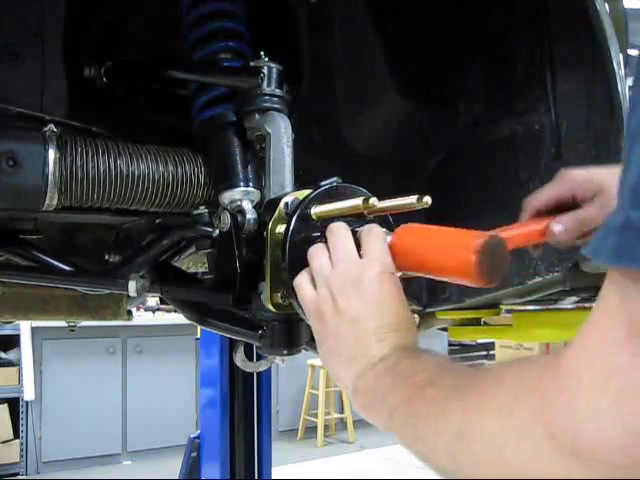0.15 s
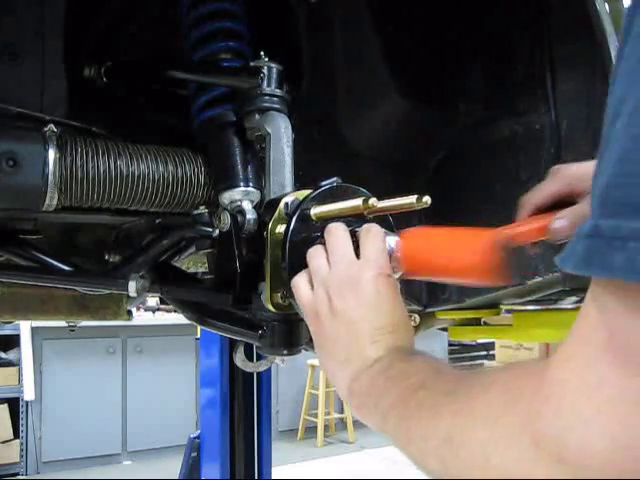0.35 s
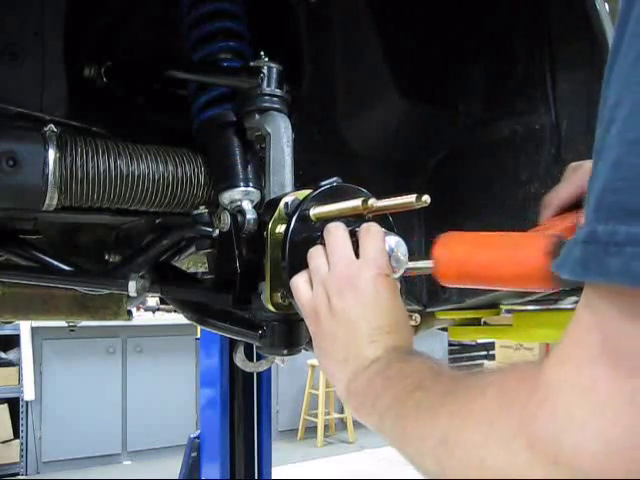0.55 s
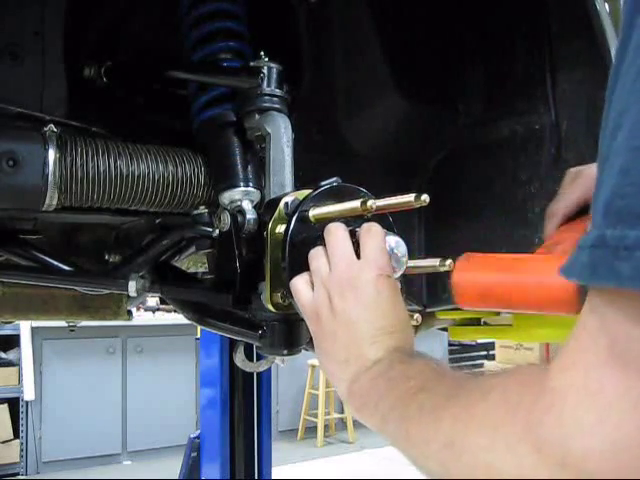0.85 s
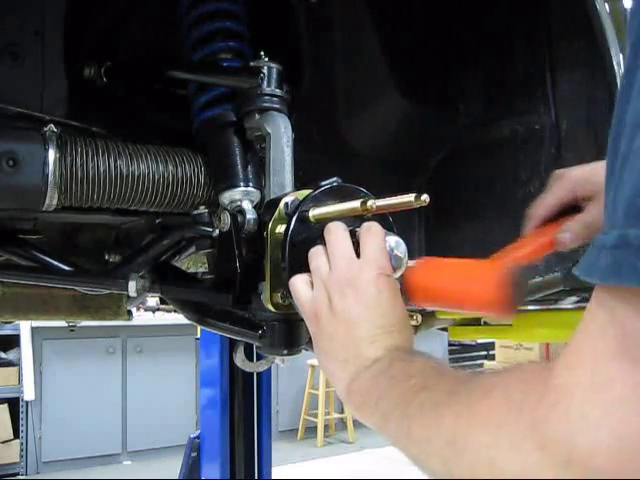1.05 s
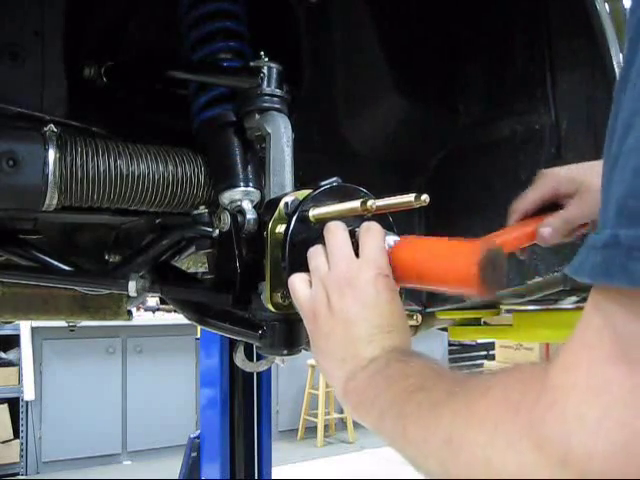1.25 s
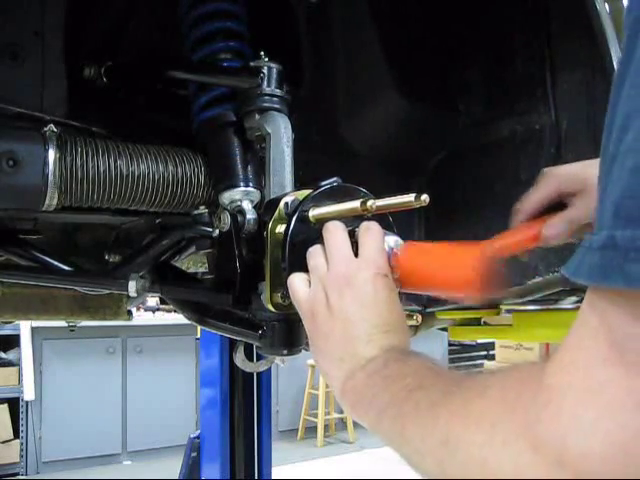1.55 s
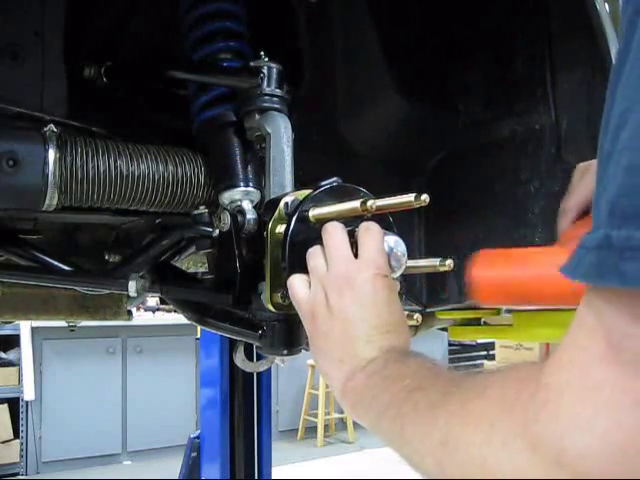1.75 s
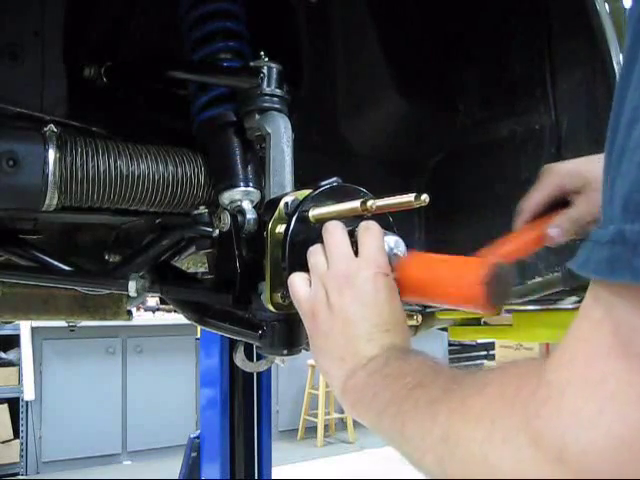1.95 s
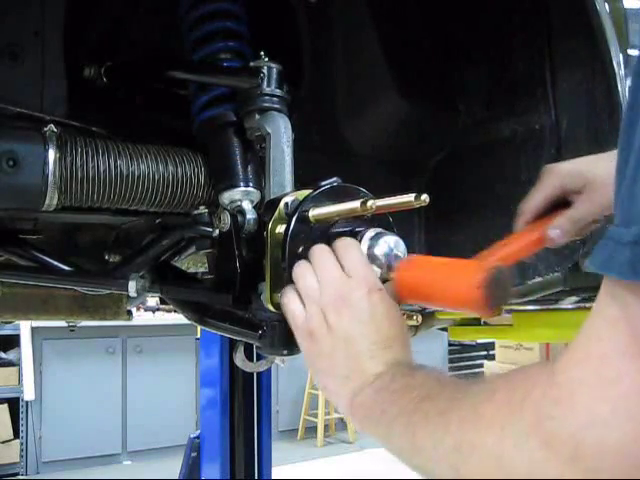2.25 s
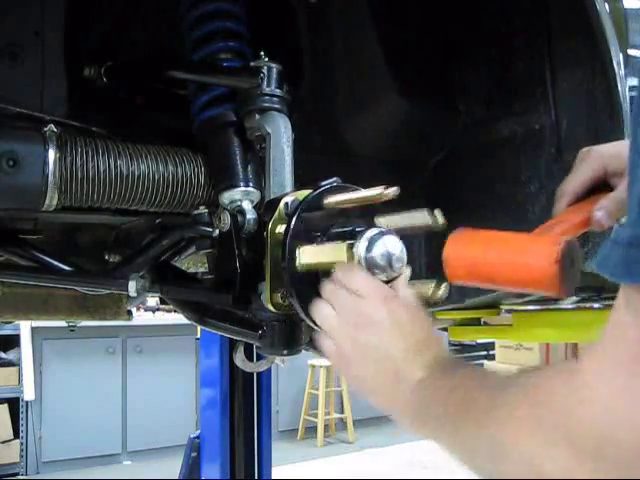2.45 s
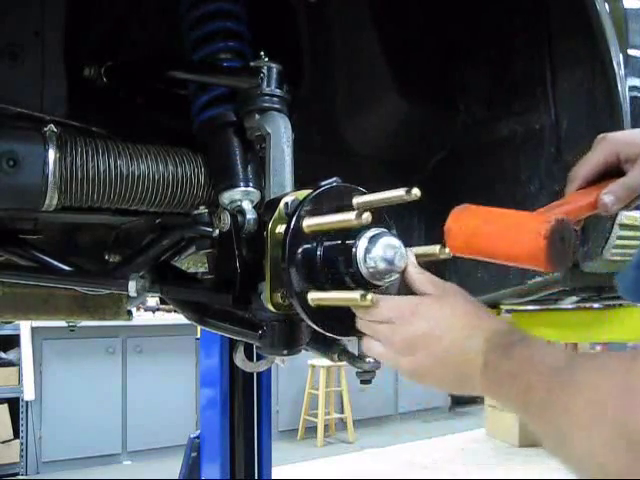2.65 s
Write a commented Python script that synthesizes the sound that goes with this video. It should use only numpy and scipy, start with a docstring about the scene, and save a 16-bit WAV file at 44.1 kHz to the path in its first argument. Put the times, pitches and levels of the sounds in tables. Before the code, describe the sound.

A mallet taps a metal cap eight times, growing louder, in an echoing workshop.

```python
"""A car workshop, the camera microphone close to a wheel hub: a rubber mallet taps a metal cap eight times.
Each swing swishes, the cap clacks (its ring differs from blow to blow), the suspension booms,
and the wheel well and the room answer. Hands rustle faintly over the steady air of the workshop.
At this distance the camera clips the blows, ducks its gain and lets the echo swell back."""
import sys
import numpy as np
from scipy import signal
from scipy.fft import rfft, irfft, next_fast_len
from scipy.io import wavfile
from scipy.ndimage import uniform_filter1d, map_coordinates

SR = 44100
rng = np.random.default_rng(int(sys.argv[2]) if len(sys.argv) > 2 else 0)


def log_audio(samples):
    """Write samples as a 16-bit WAV file to the path given in sys.argv[1]."""
    # one column per channel
    frames = np.atleast_2d(samples).T
    # limit to full scale, then quantise
    limited = np.clip(frames, -1, 1)
    pcm = np.round(limited * 32767).astype(np.int16)
    wavfile.write(sys.argv[1], SR, pcm)


N = 123479
EVENT_N = 57344  # samples for one event to ring out
EVENT_T, SCENE_T = np.arange(EVENT_N) / SR, np.arange(N) / SR

# Mallet blows: start_s, level_db, clack_db, bass_db, middle_db, presence_db, treble_db, top_db,
# ring_blend (0 is the cap's ring A, 1 its ring B), ring_length_factor
BLOWS = [(.2059, -14, 6, -4, 2, 1.5, -2.5, -0.5, 0.07, 0.88),
         (0.486, -11.5, 6, 6, 2.5, 4, -3, -4, 0.93, 0.7),
         (0.7605, -5, 2.5, 5, 4.5, 2, -2.5, -4.5, 0.6, 1.17),
         (1.0525, -2, 0.5, 6, 0.5, 2, -0.5, -1, 0.58, 1),
         (1.3499, -1.5, -2.5, 2.5, 4, 4.5, 0.5, 2, 0.27, 1.54),
         (1.6682, 4.5, -14.5, -2, -3, 1, 7, 2, 0.93, 1.9), (1.9884, 1.5, -5, 2, .5, -2.5, -2, -8, 0.99, 3),
         (2.2731, 2, -4, 0, 0, -2, -3.5, -8, 0.36, 2.6)]
# Modes of the cap, with two sets of levels: pitch_hz, ring_a_db, ring_b_db, base_t60_s
CAP_MODES = [(572, 1, -8, 0.014), (603, -13, -45, 0.34), (830, -6.5, -1.5, 0.0084), (1050, -9, -1.5, 0.011),
             (1430, -6.5, -7.5, 0.033), (1826, -19, -0.5, 0.0055), (2140, -11, -7.5, 0.01),
             (2705, -7.5, 4.5, 0.011), (3013, 2.5, -15, 0.0097), (4280, 0, -0.5, 0.0084),
             (4630, -4, 1.5, .011), (5464, -0.5, 1.5, 0.0095), (6860, -22, -10.5, 0.01),
             (9950, -14, -1, 0.0068)]
# Contact noise of mallet on cap: frequency_hz, gain_db
CRACK_SPECTRUM = [(60, 2), (300, -17), (1000, 8), (3000, -3), (6000, 0.5), (9000, -15.5), (15000, 5.5)]
# Modes of hub and suspension: pitch_hz, level_db, t60_s
HUB_MODES = [(142.9, -21, 0.43), (179, -18, 0.41), (199, -11, 0.28), (252.4, -19.5, 0.58),
             (295.3, -23.5, .7), (339.9, -18.5, 0.78), (359, -17, 0.7), (386, -9, 0.13), (455, -20, 0.55),
             (595, -24.5, 0.62), (764, -15.5, 0.23), (848, -27, 0.81), (996, -32, 1), (1154, -35, 1.0),
             (1420, -24.5, 0.64), (3960, -32, 0.55), (4100, -29, 0.38)]
# Close reflections in the wheel well: frequency_hz, gain_db
WELL_SPECTRUM = [(80, -43), (200, -36), (600, 2), (1500, 8), (3000, 3), (6000, 2), (14000, -6.5)]
# Colour of the workshop's echo: frequency_hz, gain_db
ECHO_SPECTRUM = [(30, -43), (75, -12.5), (120, -4.5), (180, 7), (330, 6), (500, 3.5), (900, 1), (1400, -4),
                 (1900, -9.5), (3300, -16.5), (5200, -14), (6800, -18), (9000, -23.5), (15000, -23)]
# Decay of the workshop's echo: frequency_hz, t60_s
ECHO_DECAY = [(100, 1.0), (300, 0.68), (900, 0.58), (2500, 0.71), (6000, 0.62), (14000, 0.42)]
# Mallet swings at their loudest: peak_s, level_db
SWING_PEAKS = [(.15, -60.5), (0.438, -51), (.725, -49), (1.005, -47.5), (1.305, -47), (1.606, -46.5),
               (1.935, -52), (2.225, -45.5)]
# Thin hiss of a swing, also of the hand's tick: frequency_hz, gain_db
SWISH_SPECTRUM = [(500, -25), (2000, -8), (3500, 13), (6000, 8), (9000, 6), (13000, 12.5), (15500, 10)]
# Hands settling: frequency_hz, gain_db
RUSTLE_SPECTRUM = [(100, -54), (500, -53), (1400, -36), (3000, -42.5), (6000, -53), (12000, -68)]
# Steady air of the workshop: frequency_hz, gain_db
AIR_SPECTRUM = [(30, -43), (100, -33), (200, -44.5), (600, -40.5), (1500, -48.5), (3000, -51), (6000, -56),
                (10000, -57), (15000, -53)]
# Response of the camera microphone: frequency_hz, gain_db
MIC_RESPONSE = [(20, -4), (60, -3), (150, -2), (9000, 2), (12500, -0.5), (15500, -3.5)]


def mallet_taps():
    """Close up, every blow sounds cap, hub and room; how the head lands sets its colour."""
    track = np.zeros(N)
    for start_s, level_db, clack_db, *tone_db, ring_blend, ring_length in BLOWS:
        bass, middle, presence, treble, top = tone_db
        tone = [(330, bass), (620, middle), (1300, 0), (2600, presence), (5500, treble), (12000, top)]
        clack = amp(clack_db) * cap_clack(ring_blend, ring_length)
        blow = clack + hub_boom() + workshop_echo(clack)
        add(track, start_s, amp(level_db) * colour(blow, tone))
    return track


def cap_clack(ring_blend, ring_length, detune=0.01, crack_t60_s=0.0026):
    """The hand-damped cap: short modes, blending two sets of levels, and a contact crack."""
    ring = np.zeros(EVENT_N)
    for k, (pitch_hz, ring_a_db, ring_b_db, base_t60_s) in enumerate(CAP_MODES):
        level_db = ring_a_db + ring_blend * (ring_b_db - ring_a_db)
        envelope = amp(level_db) * fade(EVENT_T, base_t60_s * ring_length)
        detuned_hz = pitch_hz * (1 + rng.normal(0, detune))
        ring += (-1) ** k * envelope * np.sin(2 * np.pi * detuned_hz * EVENT_T)
    crack = rng.choice([-1, 1], EVENT_N) * fade(EVENT_T, crack_t60_s * ring_length)
    return ring + colour(crack, CRACK_SPECTRUM)


def hub_boom(attack_s=0.0025, drift_rad=0.93):
    """Hub and suspension ring low, with faint steel tones above; each mode wanders in phase."""
    boom = np.zeros(EVENT_N)
    for pitch_hz, level_db, t60_s in HUB_MODES:
        drift = drift_rad * wobble(knots_per_s=23.8)
        phase = 2 * np.pi * (pitch_hz * EVENT_T + rng.random()) + drift
        boom += amp(level_db) * fade(EVENT_T, t60_s) * np.sin(phase)
    return boom * (1 - np.exp(-EVENT_T / attack_s))


def workshop_echo(clack, cap_echo_db=-19):
    """Close reflections in the wheel well, then the long echo of blow and cap from the room."""
    well = colour(rng.standard_normal(EVENT_N) * fade(EVENT_T, t60_s=0.046), WELL_SPECTRUM)
    room = diffuse_tail()
    cap_echo = signal.fftconvolve(clack, room / np.linalg.norm(room))[:EVENT_N]
    blow_echo = colour(diffuse_tail(), ECHO_SPECTRUM)
    return well + blow_echo + amp(cap_echo_db) * cap_echo


def diffuse_tail(rise_s=0.0013):
    """White noise that dies band by band as sound does in the workshop."""
    hz, t, bands = signal.stft(rng.standard_normal(EVENT_N), SR, nperseg=256)
    decay = fade(t, along(ECHO_DECAY, hz)[:, None])
    _, tail = signal.istft(bands * decay, SR, nperseg=256)
    return tail[:EVENT_N] * (1 - np.exp(-EVENT_T / rise_s))


def mallet_swings(rise_s=0.016, fall_s=0.012):
    """The swinging mallet gives a thin swish just before each blow."""
    envelope = np.zeros(N)
    for peak_s, level_db in SWING_PEAKS:
        from_peak = (SCENE_T - peak_s) / np.where(SCENE_T < peak_s, rise_s, fall_s)
        envelope += amp(level_db) * np.exp(1 - np.hypot(1, from_peak))  # rounded top, exponential sides
    return envelope * colour(rng.standard_normal(N), SWISH_SPECTRUM)


def hands(tick_s=2.728, tick_db=-57):
    """Hands settle with a faint rustle; after the last blow one slips off the hub with a light tick."""
    track = colour(rng.standard_normal(N), RUSTLE_SPECTRUM) * fade(SCENE_T, t60_s=0.91)
    tick = colour(rng.standard_normal(EVENT_N), SWISH_SPECTRUM) * fade(EVENT_T, t60_s=0.057)
    add(track, tick_s, amp(tick_db) * tick)
    return track


def workshop_air():
    """Steady, low room tone behind the work."""
    return colour(rng.standard_normal(N), AIR_SPECTRUM)


def amp(db):
    """Decibels to gain."""
    return 10 ** (np.asarray(db) / 20)


def fade(t, t60_s):
    """Exponential decay by 60 dB in t60_s."""
    return np.exp(-np.log(1000) * t / t60_s)


def along(points, hz):
    """Read (frequency_hz, value) points on a log frequency axis."""
    point_hz, values = np.transpose(points)
    return np.interp(np.log(hz + 1), np.log(point_hz + 1), values)


def colour(x, points):
    """Minimum-phase filter through (frequency_hz, gain_db) points."""
    size = 2 * next_fast_len(len(x) // 2 + 4096)
    gain = amp(along(points, np.fft.rfftfreq(size, 1 / SR)))
    cepstrum = irfft(np.log(gain), size)
    cepstrum[1:size // 2] *= 2  # folding onto positive time makes the filter causal
    cepstrum[size // 2 + 1:] = 0
    return irfft(rfft(x, size) * np.exp(rfft(cepstrum)), size)[:len(x)]


def add(track, start_s, sound):
    """Mix a sound into a track at start_s."""
    part = track[int(start_s * SR):][:len(sound)]
    part += sound[:len(part)]


def wobble(knots_per_s):
    """A smooth random curve, one event long."""
    return map_coordinates(rng.standard_normal(256), [EVENT_T * knots_per_s], mode="wrap")


def scene():
    """What reaches the microphone, in mono: taps, swings and hands over the workshop's air."""
    return (mallet_taps() + mallet_swings() + hands() + workshop_air())[None]


def camera_limiter(x, threshold_db=-8.5, attack_s=0.001, release_db_per_s=122):
    """Gain drops within a millisecond or two of a loud sound and climbs back at a steady rate."""
    power = np.abs(uniform_filter1d(x ** 2, size=45, origin=22))  # mean over the last millisecond
    level_db = 10 * np.log10(power + 1e-12)
    climb_db = release_db_per_s * SCENE_T
    held_db = np.maximum.accumulate(level_db + climb_db) - climb_db
    over_db = np.maximum(held_db - threshold_db, 0)
    pole = np.exp(-1 / (attack_s * SR))
    return x * amp(-signal.lfilter([1 - pole], [1, -pole], over_db))


def record(dry, ceiling=0.79, hardness=8.7, notch_hz=7874, notch_half_width_hz=295, top_hz=15700):
    """The close camera limits, clips and colours the sound, notches the treble and cuts off the top."""
    limited = camera_limiter(dry[0])
    clipped = limited / (1 + np.abs(limited / ceiling) ** hardness) ** (1 / hardness)
    size = next_fast_len(N + SR // 2)
    hz = np.fft.rfftfreq(size, 1 / SR)
    notch_db = -22.5 / (1 + ((hz - notch_hz) / notch_half_width_hz) ** 2)
    low_pass = 1 / np.sqrt(1 + (hz / top_hz) ** 240)
    response = amp(notch_db + along(MIC_RESPONSE, hz)) * low_pass
    return irfft(rfft(clipped, size) * response, size)[None, :N]


dry = scene()
out = record(dry)
log_audio(out)
```